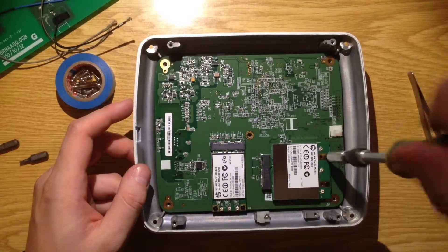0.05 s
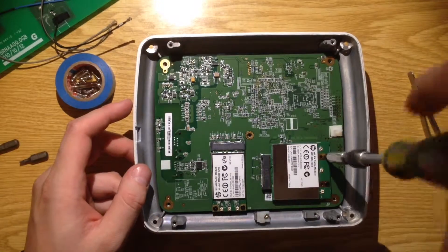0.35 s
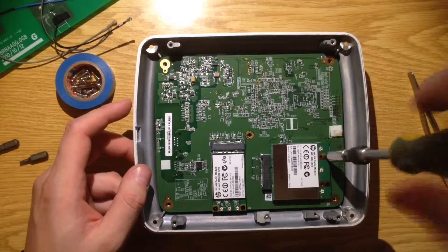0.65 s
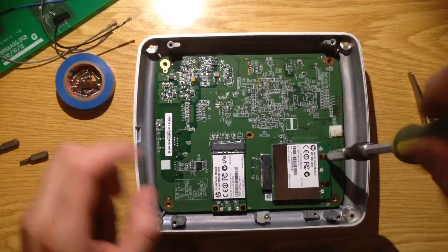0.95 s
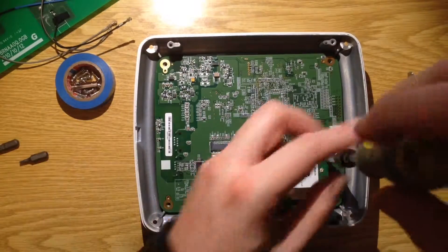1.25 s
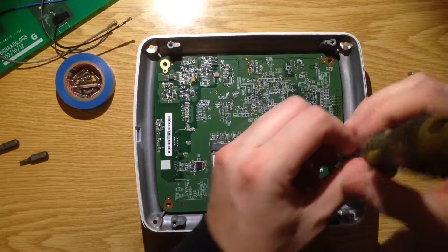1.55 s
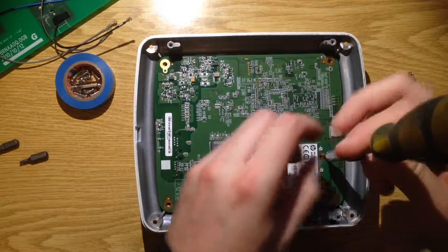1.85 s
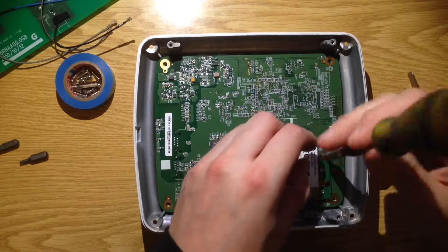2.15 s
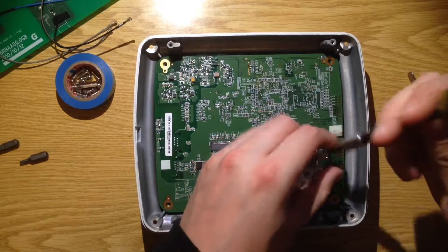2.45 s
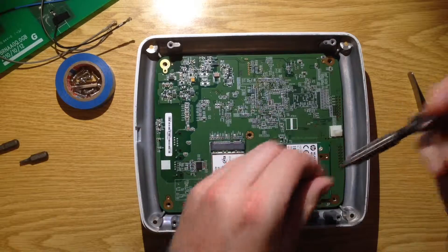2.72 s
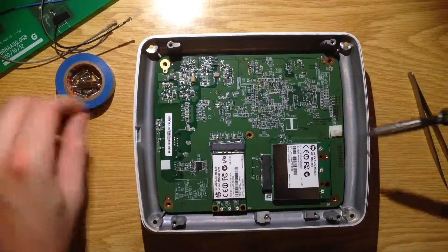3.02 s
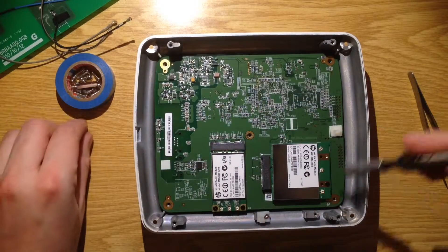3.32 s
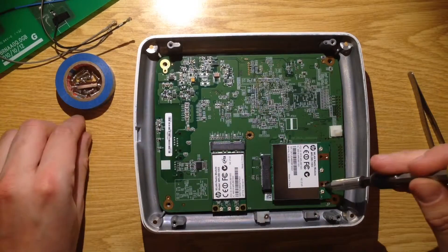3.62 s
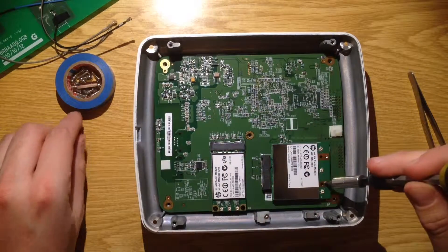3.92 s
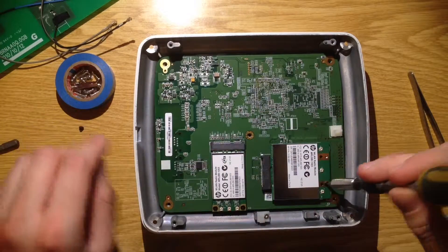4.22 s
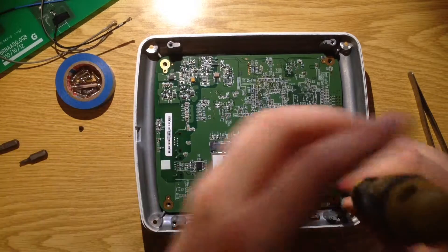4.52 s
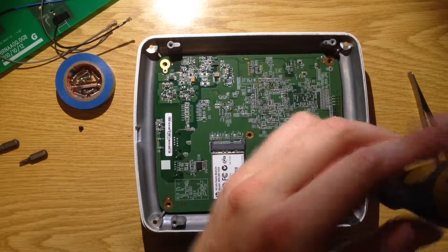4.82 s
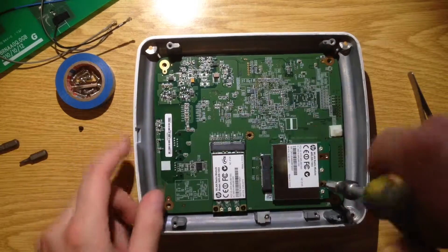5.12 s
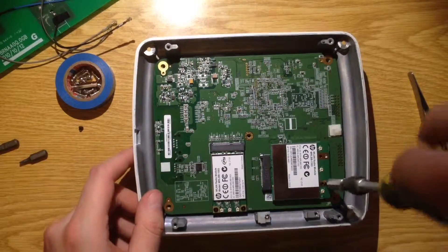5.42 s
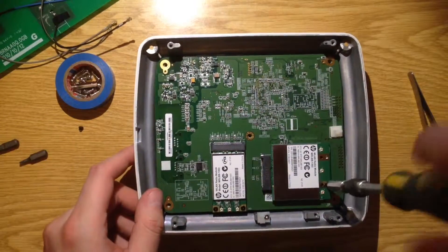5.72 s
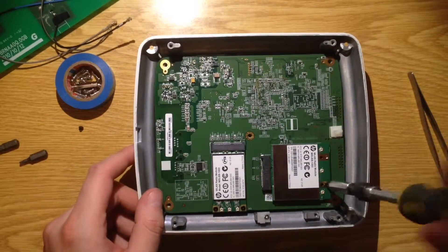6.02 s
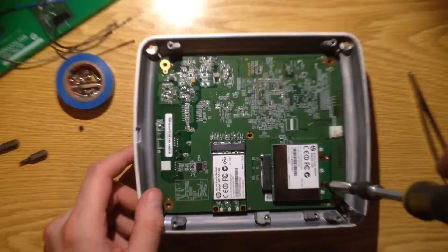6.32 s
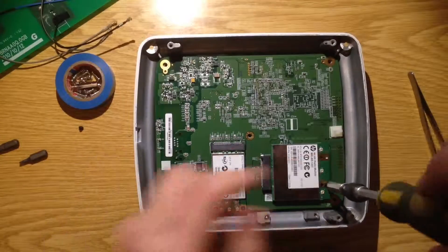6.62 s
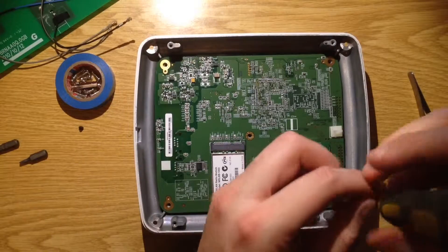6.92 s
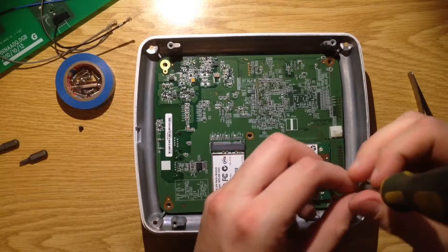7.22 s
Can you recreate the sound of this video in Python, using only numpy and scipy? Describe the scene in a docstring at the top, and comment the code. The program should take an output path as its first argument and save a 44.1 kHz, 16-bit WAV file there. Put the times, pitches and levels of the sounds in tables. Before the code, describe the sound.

A hand screwdriver bumps a metal case on a wooden table with a dull knock. From about 0.4 to 1 second its tip catches and slips in a small screw five times, the first loudest, so the case thumps and rings briefly while the thread grinds softly. Scattered knocks and light steel ticks follow until about 2.3 seconds, then only a few faint ticks. At about 3.7 seconds a tiny screw drops on the table and quickly bounces to rest. Sharp steel taps come around 4 seconds, the hardest leaving a faint ring. From 5 to 6.6 seconds the tool is seated again and makes five slower, duller twists, with soft scraping and low bumps as the case rocks. A sharp click and a few light ticks close by 7.2 seconds. The microphone is close, with steady hiss, low hum and a short small-room echo.

```python
"""First come dull knocks: a hand screwdriver bumps a metal case lying on a wooden table.
It loosens small screws on the circuit board inside. The bit (its tip) catches and slips in the screw
heads, so the case thumps, rings and rocks, the steel shaft ticks, and the threads grind softly.
Halfway through, a freed screw drops on the table and bounces to rest.
A small room adds a short echo, and a close camera microphone adds steady hiss."""
import sys
import numpy as np
from scipy import signal
from scipy.fft import rfft, irfft, next_fast_len
from scipy.io import wavfile
from scipy.ndimage import uniform_filter1d, map_coordinates

SR = 44100
rng = np.random.default_rng(int(sys.argv[2]) if len(sys.argv) > 2 else 0)


def generate_wav(sig):
    """Save sig (samples, or channels by samples) to the path in sys.argv[1] as 16-bit PCM at SR."""
    pcm = np.round(np.clip(np.atleast_2d(sig).T, -1, 1) * 32767).astype(np.int16)
    wavfile.write(sys.argv[1], SR, pcm)


N = 324135
T = np.arange(SR // 4) / SR  # time within one blow, in seconds

# Each twist: the bit catches, then slips. A positive tilt favours the higher tones.
# slip t/s, slip level/dB, brightness/dB, ring tilt/(dB per octave), catch t/s, catch level/dB, push/dB
TWISTS = [(0.3899, -20, -4.5, 12, 0.359, -47, -46), (0.5998, -29, -11, 3, 0.576, -44, -54.5),
          (0.7222, -31, -4.5, -2, 0.7, -58, -58), (0.8319, -34.5, -5.5, -1, 0.8073, -38, -60),
          (0.9336, -38.5, -7, 6, 0.9122, -33, -55), (5.4336, -21.5, -9.5, -15.5, 5.39, -34, -44),
          (5.6713, -25, -10, -20, 5.643, -53, -44), (5.9305, -24.5, -9, -9, 5.8843, -34, -50),
          (6.1419, -24.5, -7, -4, 6.0948, -50, -48), (6.3795, -23.5, -8, -21, 6.3243, -34, -51)]
# The tool bumps the case, or the case drops back after a slip:
# t/s, ring level/dB, thump level/dB, brightness/dB, thump tilt/(dB per octave)
BUMPS = [(0.0797, -49.5, -55, 1.5, -12), (0.0939, -28, -29, -1, 11.5), (0.457, -40, -42, -13.5, 15),
         (0.6194, -34.5, -39, -4, 14), (0.758, -48, -41, -5, 8), (1.0623, -35, -33, 1.2, 1),
         (1.3306, -56.5, -70, -0.5, 0.5), (1.574, -54.5, -50.5, 0, 7), (1.694, -56, -42, -3, -3),
         (1.707, -52.5, -43, -8, 5), (1.758, -36, -31.5, -1, -5), (1.835, -51, -51.5, -2.5, 10),
         (2.0939, -35.5, -31, -2, -12), (2.1064, -43, -47, -1, -8), (3.642, -45.5, -43, 0.5, 22),
         (3.6705, -53, -55.5, 2.5, 13), (3.9393, -45, -48.5, -8, 25), (3.9842, -55, -64, -2, 29),
         (4.132, -37.5, -39, -6, 24), (4.155, -44, -40, -3, 10), (4.301, -68, -56, 0, -10),
         (4.373, -67, -50, 7, -3.5), (5.0091, -40.5, -35.5, -20.5, -31), (5.192, -41, -42.5, -27, 25),
         (5.2358, -46.5, -40, -15, -20), (5.326, -29.5, -32.5, -9.5, 18), (5.498, -47, -38.5, -16, -16),
         (5.589, -40, -42, -21, 29), (5.8303, -45, -47, -11, 6), (6.2666, -40, -46.5, -17, 25),
         (6.4418, -43, -43, -21, -4), (6.4839, -40.5, -39.5, -12.5, 0), (6.605, -35.5, -35, -7, 11)]
# Steel touches steel: t/s, bit level/dB, brightness/dB (bit over shaft), contact time/s
STEEL_TOUCHES = [(0.2305, -54, 10, 0.015), (0.3066, -58.5, 4, 0.023), (0.3396, -54.5, 2, 0.1),
                 (0.39, -34.5, 20, 0.012), (0.9957, -59, -1, 0.04), (1.132, -63.5, -9, 0.021),
                 (1.88, -57.5, -1.5, 0.045), (2.065, -61.5, -1, 0.14), (2.092, -51.5, -11, 0.082),
                 (2.119, -63, 1, 0.38), (2.2015, -62.5, -8, .028), (2.265, -53, -4, 0.027),
                 (2.542, -57, 32, 0.02), (2.827, -66.5, 26, .025), (2.901, -59.5, 32, 0.021),
                 (3.6706, -45, 7, 0.019), (3.911, -57, -6, .13), (3.9387, -39.5, 2, .035),
                 (3.9844, -54, -5, 0.038), (4.126, -48, -2.5, 0.055), (4.1324, -33.5, 5, 0.011),
                 (4.1356, -32, 5.5, 0.011), (5.0814, -55.5, -2.5, 0.12), (5.1233, -34, 0.5, 0.02),
                 (5.6225, -47.5, -1, 0.023), (5.854, -48.5, -1, 0.092), (6.006, -57, -0.5, 0.034),
                 (6.174, -53, 14, 0.02), (6.2753, -59, -6.5, 0.098), (6.4342, -52, 5, 0.029),
                 (6.597, -53.5, -6, .035), (6.6022, -36.5, 1.5, 0.025), (6.8057, -49.5, 4, 0.036),
                 (6.823, -54, -13, 0.012), (6.8976, -51.5, 1, 0.05), (6.962, -66.5, -12, 0.039),
                 (7.147, -54.5, -4.5, 0.049), (7.196, -62.5, -11.5, 0.027)]
# The case settles on its feet: t/s, level/dB
CASE_LANDINGS = [(5.015, -46.5), (5.392, -44), (5.645, -52), (5.885, -44), (6.326, -45)]
# The tumbling screw lands, now on its head, now on its tip: t/s, level/dB
SCREW_LANDINGS = [(3.681, -57), (3.685, -47), (3.714, -53), (3.731, -48.5), (3.7514, -52), (3.7581, -56),
                  (3.7756, -59), (3.7844, -52.5), (3.802, -62), (3.8095, -56), (3.831, -61)]

# The natural tones of each part, before a blow tilts their levels or shortens them:
# f/Hz, relative level/dB, fade time/s (the time to fall by 60 dB)
THUMP_TONES = [(164, -8.5, 0.071), (193, 4, 0.12), (244.7, 0.5, 0.054), (276.7, -3, 0.11)]  # the case's low thump on the table
CASE_TONES = [(497, -11.5, 0.016), (594.3, 4, 0.11), (705.6, 6.5, 0.078), (835.5, 4, 0.098),
              (915, -5.5, 0.12)]  # the case's dull ring
BOARD_TONES = [(1116, -4.5, .04), (1183, 8.5, 0.03), (1330, -1.5, 0.063), (1387, -3, 0.083),
               (1722, -4.5, .05), (1990, -5, 0.055), (2178, -6.5, 0.027), (2434, -11, 0.076)]  # the circuit board
SHAFT_TONES = [(1018, -18, 0.15), (1404, -2, 0.047), (1900, -2.5, 0.035), (2166, 3.5, 0.024),
               (2455, -5, .035), (2680, -15.5, .025)]  # the screwdriver's shaft
BIT_TONES = [(3200, -10.5, 0.0061), (4090, 5.5, 0.024), (4913, 9.5, 0.017), (6360, -7.5, 0.023),
             (6380, 1, 0.0239), (7210, 4.5, 0.015), (7670, 1, 0.019)]  # its tip
EDGE_TONES = [(8600, 0, .015), (9400, -2, .012), (10250, -2, .015), (10900, -3, .014), (11700, -4, .012),
              (13000, -6, .012), (14000, -8, .012)]  # the sharp top octave of a steel click
FOOT_TONES = [(84, 7, 0.135), (112, -15, 0.049)]  # the case on its feet
SCREW_TONES = [(2820, -4, .009), (3700, -6, .008), (4670, 0, .01), (5150, 0, .01), (5790, -1, .012),
               (7850, -1, .014), (8300, -4, .011), (10200, -6, .01), (12600, -8, .012), (13600, -10, .012)]  # the screw on wood

# How deep or bright each noise is: f/Hz, relative level/dB
GROAN_SPECTRUM = [(40, -33), (65, -12), (85, 4), (110, -12), (188, -1.5), (280, -9), (400, -20), (600, -8),
                  (820, -8), (1050, -14.5), (1300, -10), (2000, -18), (3500, -45)]  # the groaning case
SCRAPE_SPECTRUM = [(600, -31), (1300, -7.5), (2200, 7.5), (5000, 12), (7000, -9), (10000, -21)]  # the scraping bit and thread
HISS_SPECTRUM = [(15, -51), (25, -30), (43, -17), (75, -4), (96, -6), (122, -9), (226, -4), (313, -10.5),
                 (432, -14), (1410, -23.5), (1530, -21), (2170, -21), (3810, -18.5), (13500, -22),
                 (15400, -22)]  # background hum and hiss
# How long the room echoes: f/Hz, fade time/s
ECHO_FADES = [(100, 0.39), (250, 0.45), (700, 0.17), (2000, 0.3), (5000, 0.21), (12000, 0.11)]
# How strongly it echoes: f/Hz, level/dB
ECHO_LEVELS = [(80, -9), (200, -8.5), (700, -9.5), (2000, -13), (5000, -11.5), (12000, -20)]


def twists():
    """Every twist gives a dull bump as the loose bit catches in the screw head, then a slip."""
    out = np.zeros(N)
    for slip_s, slip_db, bright_db, tilt_db, catch_s, catch_db, _ in TWISTS:
        # for its strength, the catch thumps more heavily than the slip
        catch = jolt(catch_db, thump_db=0.5 * catch_db - 15, bright_db=-14.5,
                     length=0.3, tilt_db=7, thump_tilt_db=-8)
        slip = jolt(slip_db, thump_db=0.5 * slip_db - 17.5, bright_db=bright_db,
                    length=0.8, tilt_db=tilt_db, thump_tilt_db=7.5)
        add(out, catch_s, catch)
        add(out, slip_s, slip)
    return out


def knocks():
    """Single bumps as the tool is seated, eased back or lifted, or as the case drops back."""
    out = np.zeros(N)
    for s, ring_db, thump_db, bright_db, thump_tilt_db in BUMPS:
        tilt_db = 14 + 1.1 * bright_db  # a brighter bump favours the case's higher tones
        bump = jolt(ring_db, thump_db, bright_db, length=0.67, tilt_db=tilt_db,
                    thump_tilt_db=thump_tilt_db)
        add(out, s, bump)
    return out


def jolt(ring_db, thump_db, bright_db, length, tilt_db, thump_tilt_db):
    """One blow: the case thumps and rings; a bright blow also rattles the board and clicks the steel."""
    thump = struck(THUMP_TONES, (124.6, 375.6), crack_db=-8.5, crack_s=0.1, rise_s=0.001,
                   length=length, tilt_db=thump_tilt_db)
    ring = struck(CASE_TONES, (467, 1021), crack_db=-8, crack_s=0.089, rise_s=0.0001,
                  length=length, tilt_db=tilt_db)
    board = struck(BOARD_TONES, (1000, 2210), crack_db=-4.5, crack_s=0.047, rise_s=0.001, length=0.85)
    click = struck(BIT_TONES, (2370, 5600), crack_db=13, crack_s=0.024, rise_s=0.000827)
    edge = struck(EDGE_TONES, (5700, 11000), crack_db=21.5, crack_s=0.016, rise_s=0.00083)
    steel = amp(2.2 * bright_db - 4.5) * (click + amp(-19.5) * edge)
    return amp(thump_db) * thump + amp(ring_db) * (ring + amp(bright_db) * board + steel)


def ticks():
    """The bit finds the slot or skids off it: the steel ticks and wakes the case's higher tones."""
    out = np.zeros(N)
    for s, db, bright_db, contact_s in STEEL_TOUCHES:
        rise_s = 0.062 * contact_s
        case = struck(CASE_TONES, (196.3, 1106), crack_db=3.5, crack_s=0.013, rise_s=rise_s,
                      length=0.54, tilt_db=12.5)
        shaft = struck(SHAFT_TONES, (1157, 2790), crack_db=-5, crack_s=1.9 * contact_s, rise_s=rise_s,
                       tilt_db=8)
        bit = struck(BIT_TONES, (2880, 6950), crack_db=5.5, crack_s=contact_s, rise_s=rise_s, length=0.8)
        edge = struck(EDGE_TONES, (7100, 13380), crack_db=2.5, crack_s=0.49 * contact_s, rise_s=rise_s)
        edge_db = 12 + 1.603 * db  # harder touches sound sharper
        case_db = -33 + 0.46 * db - 0.45 * bright_db  # brighter touches stir the case less
        steel = amp(db) * bit + amp(db - bright_db) * shaft + amp(edge_db) * edge
        add(out, s, steel + amp(case_db) * case)
    return out


def shaft_ring(start_s=4.136, level_db=-58, hz=984, fade_s=0.52):
    """The shaft rings on with one pure tone after its hardest tap."""
    out = np.zeros(N)
    add(out, start_s, amp(level_db - 60 * T / fade_s) * np.sin(2 * np.pi * hz * T))
    return out


def rocking():
    """Pushing down near a corner tips the case, which settles with a low bump."""
    out = np.zeros(N)
    for s, db in CASE_LANDINGS:
        bump = struck(FOOT_TONES, (70, 135), crack_db=-16, crack_s=0.072, rise_s=0.01)
        add(out, s, amp(db) * bump)
    return out


def dropped_screw():
    """A tiny screw hops on the table, pinging at each landing as the hops die away."""
    out = np.zeros(N)
    for s, db in SCREW_LANDINGS:
        ping = struck(SCREW_TONES, (1500, 14000), crack_db=-4, crack_s=0.016, rise_s=0.0004)
        add(out, s, amp(db) * ping)
    return out


def grinding(slips_per_s=2500, swing_db=7, scrape_db=-17):
    """Around each twist, tiny slips of bit and thread make the case groan and scrape faintly."""
    # the thread catches and lets go many times a second: a smooth curve through random points
    step = 800  # samples between points
    grip = map_coordinates(rng.standard_normal(N // step + 4), [np.arange(N) / step])
    slipping = rng.random(N) < slips_per_s / SR
    slips = amp(swing_db * grip) * slipping * rng.standard_normal(N)
    groan = coloured(slips, GROAN_SPECTRUM)
    scrape = amp(scrape_db) * coloured(slips, SCRAPE_SPECTRUM)
    return hand_push() * (groan + scrape)


def hand_push(lead_s=0.027, press_db_per_s=261, relax_db_per_s=146.5):
    """The hand's push builds up, peaks just before each slip, then eases off."""
    out = np.zeros(N)
    for slip_s, *_, push_db in TWISTS:
        from_peak_s = np.arange(N) / SR - (slip_s - lead_s)
        swell_db = np.minimum(press_db_per_s * from_peak_s, -relax_db_per_s * from_peak_s)
        out = np.maximum(out, amp(push_db + swell_db))
    return out


def room(x, delay_s=0.0054):
    """The walls echo. Moving hands change the echo, so each quarter second gets a new random tail."""
    out = np.zeros(N)
    for start in range(0, N, SR // 4):
        hz, t, noise = signal.stft(rng.standard_normal(SR // 2), SR, nperseg=256)
        fade = amp(-60 * t / along(ECHO_FADES, hz)[:, None])
        energy = np.mean(fade ** 2, axis=1, keepdims=True) * SR / 2
        fade *= amp(along(ECHO_LEVELS, hz))[:, None] / np.sqrt(energy)
        tail = signal.istft(noise * fade, SR, nperseg=256)[1]
        add(out, start / SR + delay_s, signal.fftconvolve(x[start:start + SR // 4], tail))
    return out


def hiss(level_db=-63):
    """Steady noise: a low hum and the microphone's hiss."""
    return amp(level_db) * coloured(rng.standard_normal(N), HISS_SPECTRUM)


def struck(tones, crack_band_hz, crack_db, crack_s, rise_s, length=1, tilt_db=0):
    """A hit part rings with clear tones, plus a noisy crack of many crowded, fast-fading ones."""
    hz, db, fade_s = np.transpose(tones)[:, :, None]
    strength, detune = rng.standard_normal((2, len(tones), 1))
    # neighbouring tones swing opposite ways; the grip shifts their pitch a little
    direction = (-1) ** np.arange(len(tones))[:, None]
    waves = direction * np.sin(2 * np.pi * hz * (1 + 0.006 * detune) * T)
    # where the blow lands sets each tone's share; tilt_db is per octave
    db = db + 2 * strength + tilt_db * np.log2(hz / hz[0])
    ring = np.sum(waves * amp(db - 60 * T / (fade_s * length)), axis=0)
    band = signal.butter(4, crack_band_hz, "band", fs=SR, output="sos")
    burst = rng.standard_normal(len(T)) * amp(-60 * T / crack_s)
    crack = signal.sosfilt(band, burst)
    attack = 1 - np.exp(-T / rise_s)  # the force takes a moment to build
    return unit_blow(attack * (unit_blow(ring) + amp(crack_db) * unit_blow(crack)))


def unit_blow(x):
    """Scale a blow so its loudest 5 ms have an average strength (rms) of 1."""
    power = uniform_filter1d(x ** 2, SR // 200, mode="constant")
    return x / np.sqrt(np.max(power) + 1e-20)


def coloured(x, spectrum):
    """Shape x with a spectrum table, then scale it to an average strength (rms) of 1."""
    shaped = filtered(x, lambda hz: amp(along(spectrum, hz)))
    return shaped / np.sqrt(np.mean(shaped ** 2) + 1e-20)


def filtered(x, gain_at):
    """Multiply each frequency in x by gain_at(hz)."""
    size = next_fast_len(len(x) + 8192)
    hz = np.fft.rfftfreq(size, 1 / SR)
    return irfft(rfft(x, size) * gain_at(hz), size)[:len(x)]


def along(points, hz):
    """Read between the rows of a (f/Hz, value) table, with octaves evenly spaced."""
    row_hz, values = np.transpose(points)
    return np.interp(np.log(hz + 1), np.log(row_hz), values)


def amp(db):
    """Turn decibels into a multiplier."""
    return 10 ** (np.asarray(db) / 20)


def add(track, s, sound):
    """Mix a sound in at s seconds."""
    part = track[max(round(s * SR), 0):][:len(sound)]
    part += sound[:len(part)]


def scene():
    """The work on the case, the falling screw, their echo and the hiss, in one channel."""
    work = twists() + knocks() + ticks() + shaft_ring() + grinding() + rocking()
    screw = dropped_screw()
    background = hiss()
    echo = room(work + amp(5) * screw)  # the screw wakes the room a little more than the case does
    return (work + screw + echo + background)[None]


def record(dry, low_cut_hz=55, top_hz=15550):
    """The small microphone loses the deep bass; the camera keeps nothing above top_hz."""
    low_cut = signal.butter(2, low_cut_hz, "high", fs=SR, output="sos")
    thin = signal.sosfilt(low_cut, dry[0])
    return filtered(thin, lambda hz: hz < top_hz)[None]


dry = scene()
out = record(dry)
generate_wav(out)
```